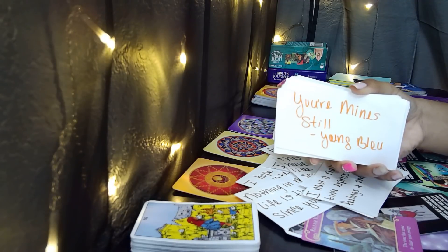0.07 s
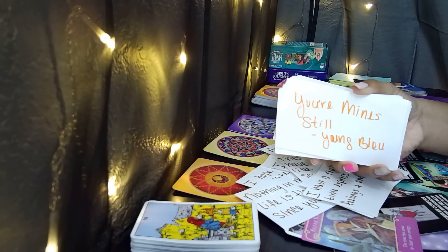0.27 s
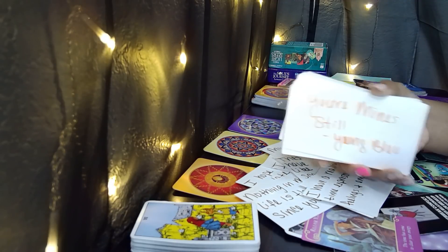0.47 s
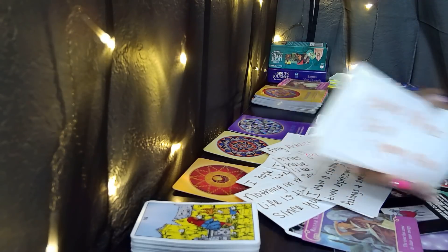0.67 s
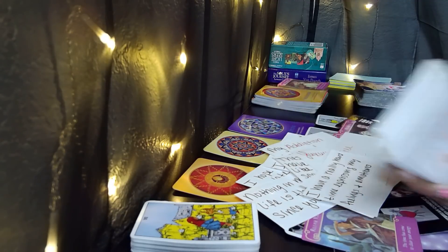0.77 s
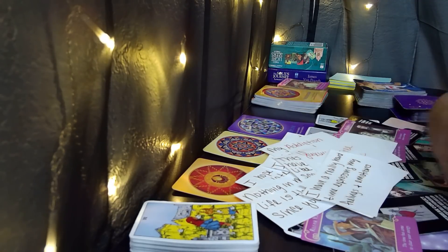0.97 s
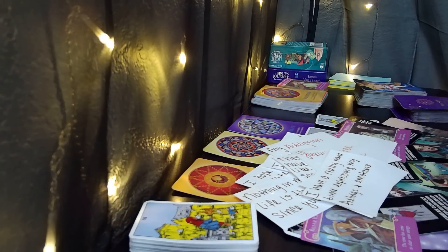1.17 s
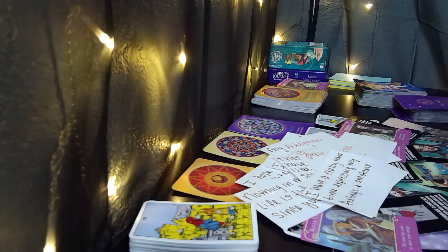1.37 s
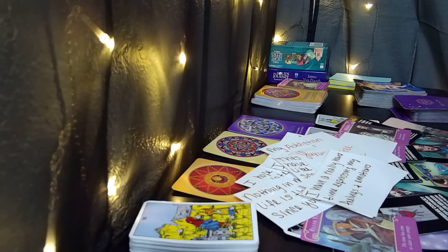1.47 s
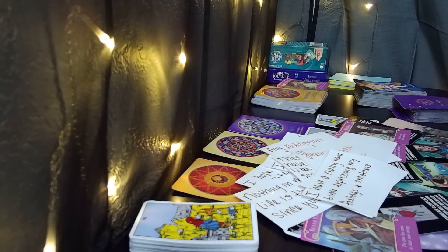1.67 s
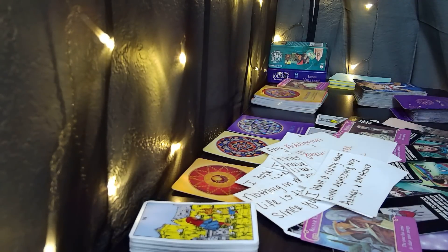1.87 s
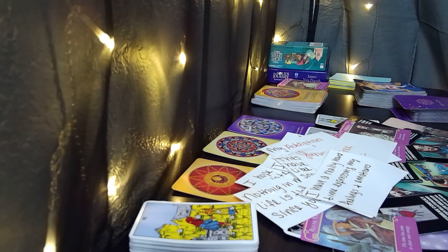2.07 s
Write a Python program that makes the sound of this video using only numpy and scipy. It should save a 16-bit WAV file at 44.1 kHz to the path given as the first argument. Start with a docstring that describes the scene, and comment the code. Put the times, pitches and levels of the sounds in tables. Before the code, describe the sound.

A stiff paper card slaps once onto a pile of cards on a table, just after a soft swish. A light tick follows. It sounds close, in a small quiet room with a faint hum.

```python
"""Low air rumble, a faint hum and hiss fill a small quiet room; then comes a soft swish.
It is a stiff paper card, swung down onto a pile of cards on a table. It brushes along, one edge
touches, then it slaps flat in a quick run of contacts that ring card and table.
The room answers briefly and a light tick follows."""
import sys
import numpy as np
from scipy import signal
from scipy.fft import rfft, irfft, dct
from scipy.io import wavfile

SR = 44100
rng = np.random.default_rng(int(sys.argv[2]) if len(sys.argv) > 2 else 0)


def to_wav(s):
    """Save 16-bit WAV."""
    ch = np.atleast_2d(s).T  # columns
    pcm = np.round(np.clip(ch, -1, 1) * 32767)  # PCM
    wavfile.write(sys.argv[1], SR, pcm.astype(np.int16))


N = 93403
TIME = np.arange(N) / SR
BIN_HZ = np.arange(N // 2 + 1) * SR / N


def from_db(db):
    """Decibels to gain."""
    return 10 ** (np.asarray(db) / 20)


def at_hz(curve, hz):
    """Read a curve on a log-frequency axis."""
    points_hz, values = np.transpose(curve)
    return np.interp(np.log(np.maximum(hz, 1)), np.log(points_hz), values)


def decay(start, t60):
    """Envelope that jumps to one, then falls 60 dB in t60 seconds."""
    return (TIME >= start) * from_db(-60 * np.clip((TIME - start) / t60, 0, 5))


def stereo_noise(colour, correlation):
    """Steady coloured noise of rms one; the lower the correlation, the wider it sounds."""
    mid, side = rfft(rng.standard_normal((2, N))) * from_db(at_hz(colour, BIN_HZ)) * (BIN_HZ > 10)
    alike = at_hz(correlation, BIN_HZ)
    noise = irfft(np.sqrt(1 + alike) * mid + np.sqrt(1 - alike) * side * [[1], [-1]], N)
    return noise / np.sqrt(np.mean(noise ** 2))


# Stereo image of the card and its reverb. Each row: frequency in Hz, left-right correlation (-1 to 1).
CARD_IMAGE = [(60, .99), (400, 1), (1000, 0.78), (1700, 0.73), (2200, -.3), (3300, -.2), (4600, -0.67),
              (6200, -.3), (8200, 0.91), (12000, -.35)]

def widen(mono):
    """A near sound reaches left and right in step in the bass, partly out of step in the treble."""
    phase_gap = np.arccos(at_hz(CARD_IMAGE, BIN_HZ))
    return irfft(rfft(mono) * np.exp(.5j * phase_gap * [[-1], [1]]), N)


# Colour of the air. Each row: frequency in Hz, relative level in dB.
AIR_COLOUR = [(12, 6.5), (25, -2), (38, -0.5), (55, -13.5), (75, -18), (120, -23.5), (210, -28), (320, -34),
              (500, -39.5), (800, -46.5), (1700, -50.5), (2100, -55), (4000, -59.5), (15500, -61.5)]
# Stereo image of the air. Each row: frequency in Hz, left-right correlation.
AIR_IMAGE = [(20, .85), (60, 0.96), (180, 0.99), (550, .85), (1600, 0.043), (2100, -.3), (5000, -.1),
             (15000, 0)]
# Tones of the hum. Each row: frequency in Hz, rms level in dB.
HUM_TONES = [(92, -59.5), (285, -75), (1744, -88), (8027, -98)]

def room_tone(air_db=-37):
    """The bed: rumble and hiss of the room's air with a faint steady hum."""
    hum = sum(from_db(db) * np.sqrt(2) * np.sin(2 * np.pi * (hz * TIME + rng.random()))
              for hz, db in HUM_TONES)
    return from_db(air_db) * stereo_noise(AIR_COLOUR, AIR_IMAGE) + hum


# Colours of the short and the long tail. Each row: frequency in Hz, relative level in dB.
SHORT_TAIL_COLOUR = [(60, 8.5), (170, 0), (330, 8), (900, -2), (1600, -2), (2500, -6.5), (3500, -6),
                     (5000, -14.5), (7000, -33), (13000, -52)]
LONG_TAIL_COLOUR = [(100, 3.5), (370, 10.5), (700, -3.5), (1200, -1), (1850, 2.5), (2600, -6), (3600, -2.5),
                    (5000, -6.5), (7000, -15), (13000, -27)]

def room_tail(colour, gain_db, t60, build_s=.009):
    """Every contact of the slap feeds a diffuse reverb that builds quickly and dies away."""
    power = 0
    for start, db, _ in CARD_CONTACTS:
        build = 1 - np.exp(-np.maximum(TIME - start, 0) / build_s)
        power += build * (from_db(db) * decay(start, t60)) ** 2
    return from_db(gain_db) * np.sqrt(power / 2) * stereo_noise(colour, CARD_IMAGE)


# Light touches. Each row: start in seconds, level in dB, band centre in Hz, t60 in seconds.
EDGE_TICKS = [(0.8763, -43, 1550, 0.0083), (0.8805, -52.5, 1534, 0.053), (1, -59, 5500, .02),
              (1.905, -52.5, 4500, 0.021)]

def edge_ticks(edge_ratio=1.3):
    """Fingers and card edges tick: tiny noise bursts, each ringing in its own band."""
    ticks = 0
    for start, db, hz, t60 in EDGE_TICKS:
        low, high = hz / edge_ratio, hz * edge_ratio
        band = signal.butter(2, [low, high], "band", fs=SR, output="sos")
        makeup_gain = np.sqrt(SR / 2 / (high - low))
        burst = decay(start, t60) * rng.standard_normal(N)
        ticks += from_db(db) * makeup_gain * signal.sosfilt(band, burst)
    return widen(ticks)


# Swell and fade of the swish. Each row: time in seconds, level in dB.
SWISH_ENVELOPE = [(.45, -93), (0.621, -73), (.78, -75), (0.894, -69), (.915, -58), (.955, -58.5),
                  (1.005, -60), (1.04, -65.5), (1.15, -71.5), (1.3, -71), (1.402, -90)]
# Colour of the swish. Each row: frequency in Hz, relative level in dB.
SWISH_COLOUR = [(150, -5), (360, 6), (700, -5), (1300, -0.5), (2000, -3), (2600, -6), (3300, 1.5),
                (5200, .5), (6500, -8.5), (9000, -12.5), (15000, -25.5)]

def card_swish(grain_db=2, grains_per_s=270):
    """The moving card brushes along with a soft, grainy friction."""
    times, levels_db = np.transpose(SWISH_ENVELOPE)
    grain = np.interp(TIME * grains_per_s, np.arange(N), rng.standard_normal(N))
    envelope = from_db(np.interp(TIME, times, levels_db) + grain_db * grain)
    return envelope * stereo_noise(SWISH_COLOUR, CARD_IMAGE)


def soften(hit, cutoff_hz):
    """One-pole low-pass: a softer contact sounds duller."""
    pole = np.exp(-2 * np.pi * cutoff_hz / SR)
    return signal.lfilter([1 - pole], [1, -pole], hit + 1e-18)


def ring(clicks, hz, t60):
    """One resonance: each click starts a dying sine of its own height."""
    radius = np.exp(-np.log(1000) / (t60 * SR))
    angle = 2 * np.pi * hz / SR
    return signal.lfilter([0, np.sin(angle)], [1, -2 * radius * np.cos(angle), radius ** 2], clicks + 1e-18)


# The card landing flat. Each row: start in seconds, level in dB, low-pass cutoff in Hz.
CARD_CONTACTS = [(1.3132, -15.5, 5800), (1.3226, -5.5, 6000), (1.3273, 1.47, 6500), (1.3299, -0.13, 2996),
                 (1.33284, -3.5, 2050), (1.3364, -10, 1148), (1.3409, -18.5, 1250)]
# Resonances of card and table. Each row: frequency in Hz, gain in dB, t60 in seconds.
BODY_MODES = [(62, -31, .4), (98.6, -15, 0.19), (300, -21, 0.046), (549, -24.5, .095), (775.6, -29, .11),
              (1157, -30, 0.052), (1310, -25.5, 0.07), (1502, -20, 0.054), (1658, -19, .06),
              (1946, -19, 0.056), (2964, -25.5, 0.049), (3300, -16.5, .046), (3740, -20, .04),
              (4630, -26, .035)]
# Colour of the dry crack of paper on paper. Each row: frequency in Hz, relative level in dB.
CRACK_COLOUR = [(35, -22), (100, -4), (300, -4.5), (550, -5), (1000, -10), (1700, 0), (2500, -4), (3600, 1),
                (5000, -6), (7500, -27), (11700, -32)]

def card_slap(snap_db=3.5, snap_band_hz=(1470, 4800), crack_db=-11.6, crack_t60=.03):
    """Each contact has a sharp snap, gives a short crack of paper and rings card and table."""
    paper = stereo_noise(CRACK_COLOUR, CARD_IMAGE)
    clicks = crack = 0
    for start, db, cutoff_hz in CARD_CONTACTS:
        clicks += from_db(db) * soften(signal.unit_impulse(N, round(start * SR)), cutoff_hz)
        crack += from_db(db) * soften(paper * decay(start, crack_t60), cutoff_hz)
    snap = signal.sosfilt(signal.butter(3, snap_band_hz, "band", fs=SR, output="sos"), clicks)
    body = sum(from_db(db) * ring(clicks, hz, t60) for hz, db, t60 in BODY_MODES)
    slap = widen(from_db(snap_db) * snap + body) + from_db(crack_db) * crack
    low_cut = signal.butter(2, 56.4, "high", fs=SR, output="sos")
    high_cut = signal.butter(10, 11800, fs=SR, output="sos")
    return signal.sosfilt(np.vstack([low_cut, high_cut]), slap)


def scene():
    """The slap up front with a full short tail and a faint long one, over swish, ticks and room tone."""
    slap = card_slap()
    short_tail = room_tail(SHORT_TAIL_COLOUR, gain_db=-24.5, t60=.31)
    long_tail = room_tail(LONG_TAIL_COLOUR, gain_db=-52.5, t60=1.44)
    return slap + short_tail + long_tail + card_swish() + edge_ticks() + room_tone()


# Lean of the stereo picture. Each row: frequency in Hz, left minus right in dB.
STEREO_BALANCE = [(20, -3), (100, -0.2), (800, -0.2), (1400, -0.5), (2000, 1), (2500, 1), (3300, -4),
                  (4300, 0), (8000, 0.5), (12000, .5)]

def record(dry, fade_in_s=.006, high_cut_hz=15750):
    """Master: colour left and right slightly apart, fade in and cut the very top."""
    lean_db = at_hz(STEREO_BALANCE, np.arange(N) * SR / 2 / N) * [[.5], [-.5]]
    coloured = dct(dct(dry, norm="ortho") * from_db(lean_db), type=3, norm="ortho")
    high_cut = signal.ellip(10, .1, 70, high_cut_hz, fs=SR, output="sos")
    return signal.sosfilt(high_cut, coloured * np.minimum(TIME / fade_in_s, 1))


dry = scene()
out = record(dry)
to_wav(out)
```